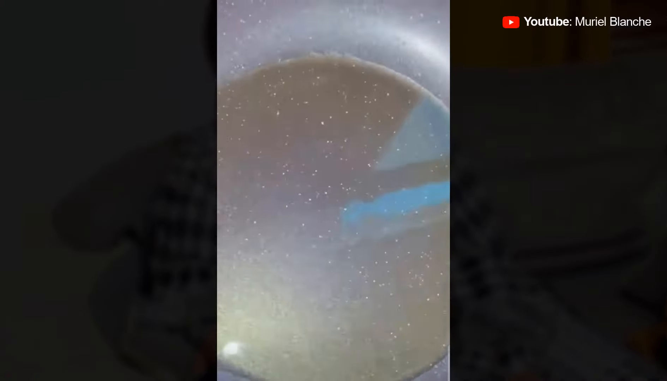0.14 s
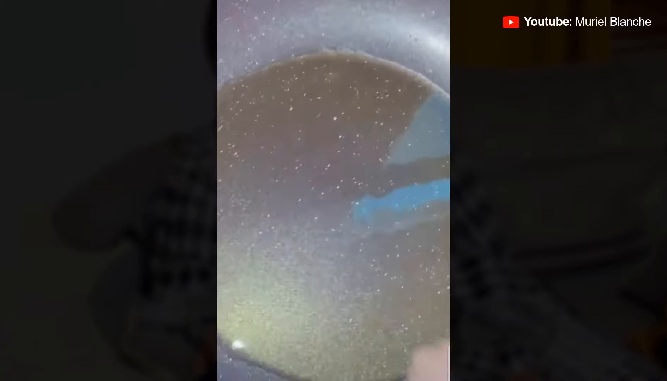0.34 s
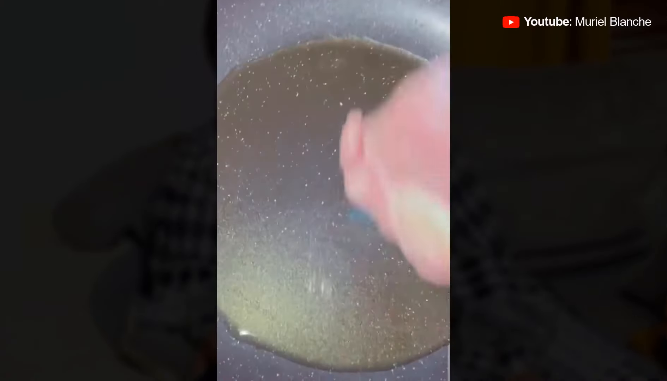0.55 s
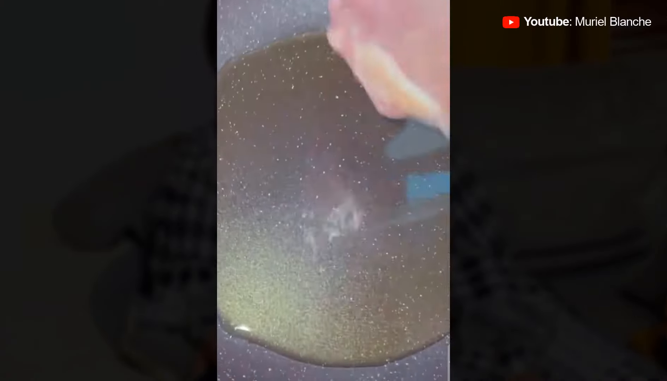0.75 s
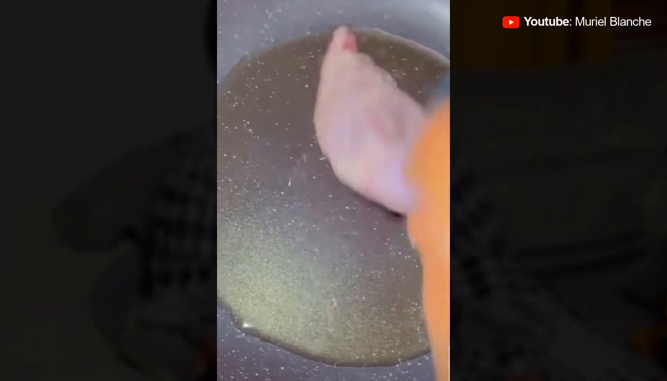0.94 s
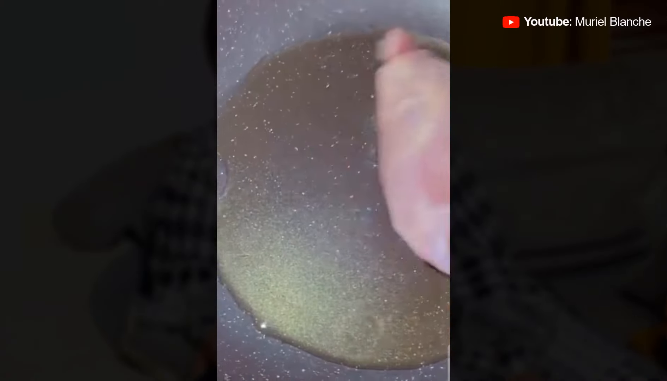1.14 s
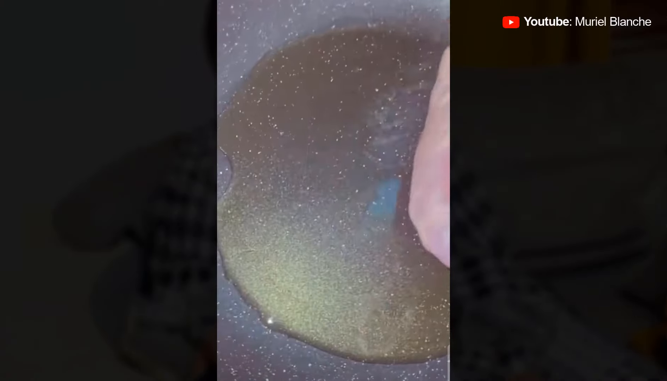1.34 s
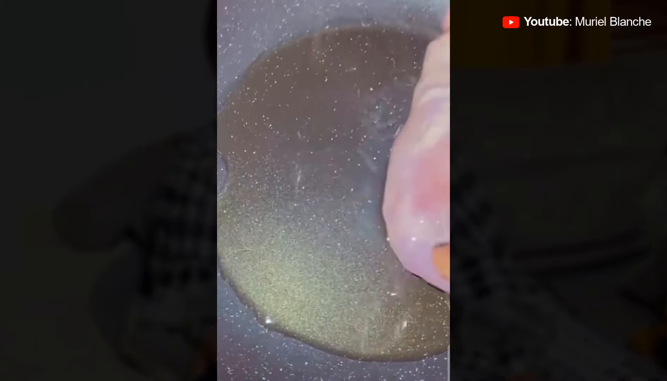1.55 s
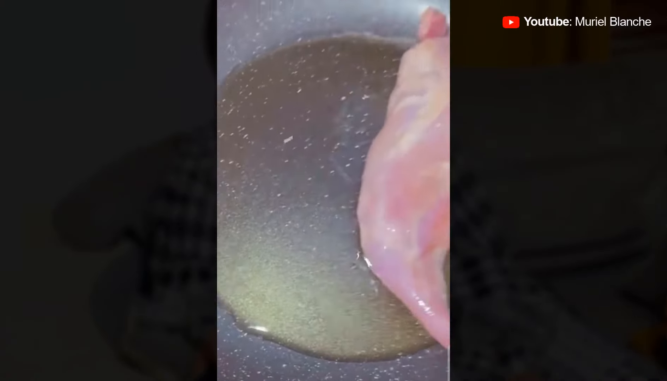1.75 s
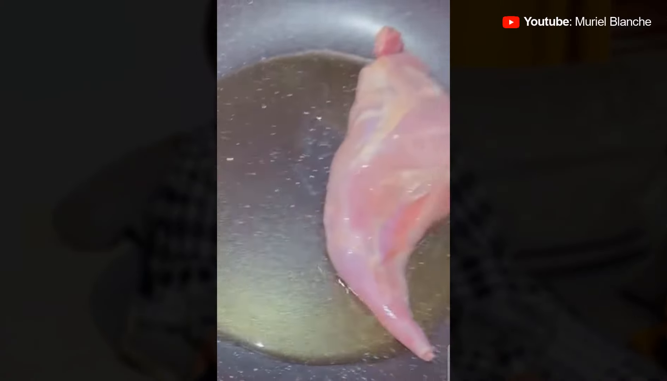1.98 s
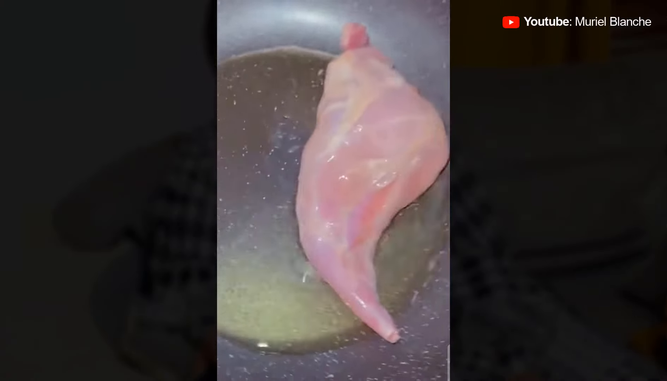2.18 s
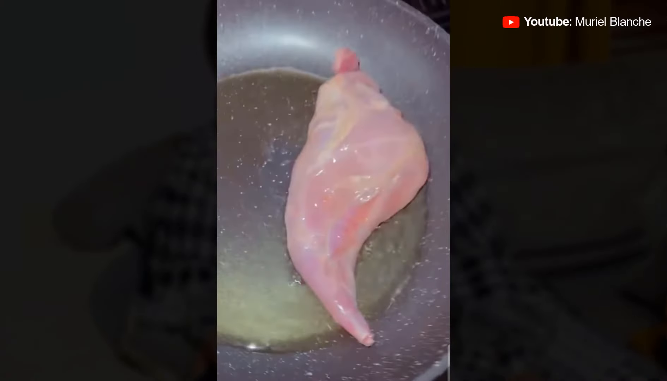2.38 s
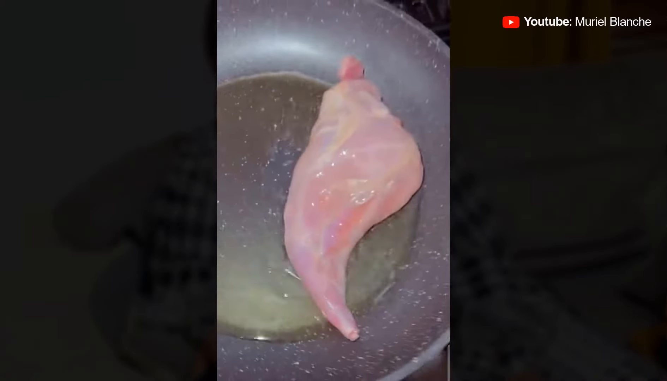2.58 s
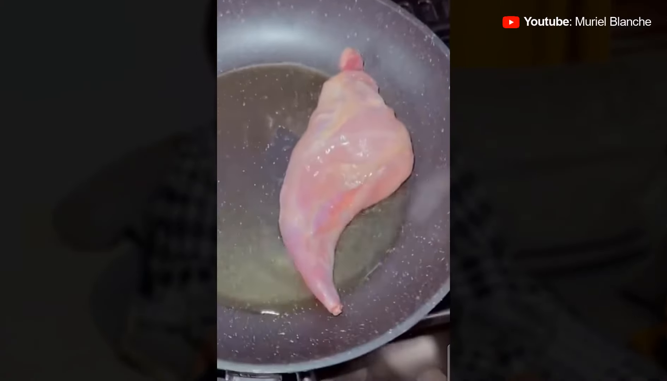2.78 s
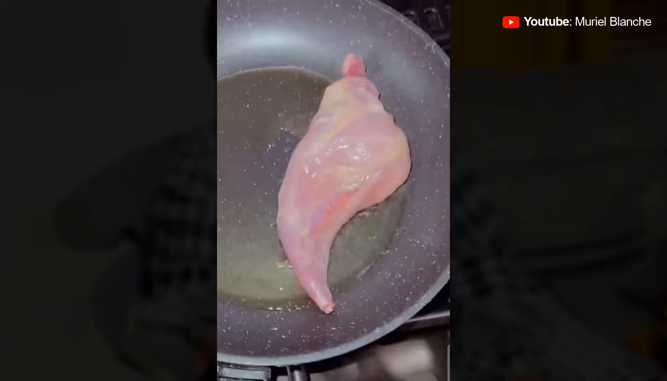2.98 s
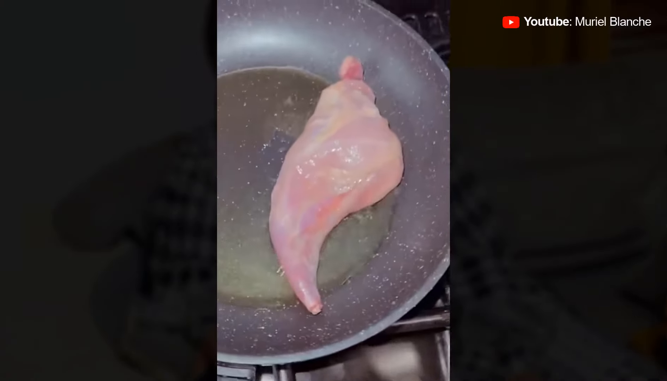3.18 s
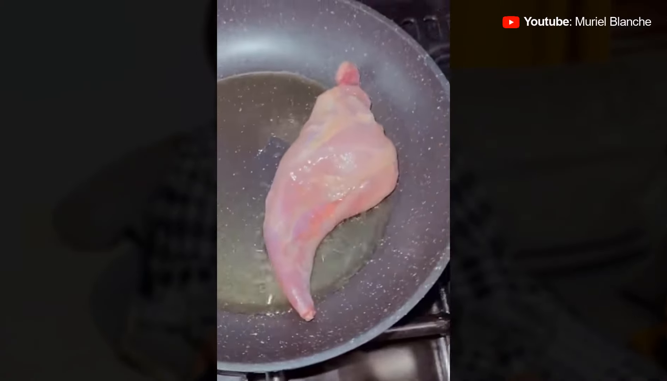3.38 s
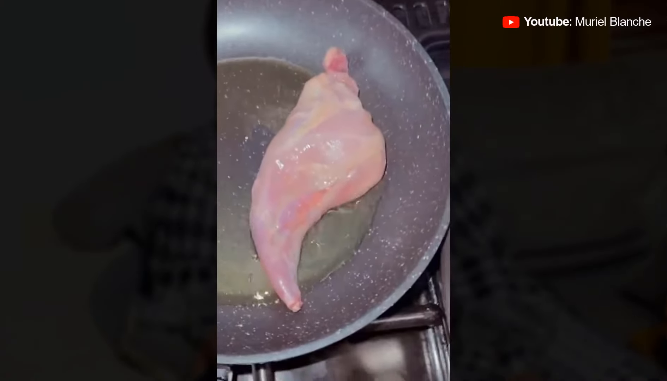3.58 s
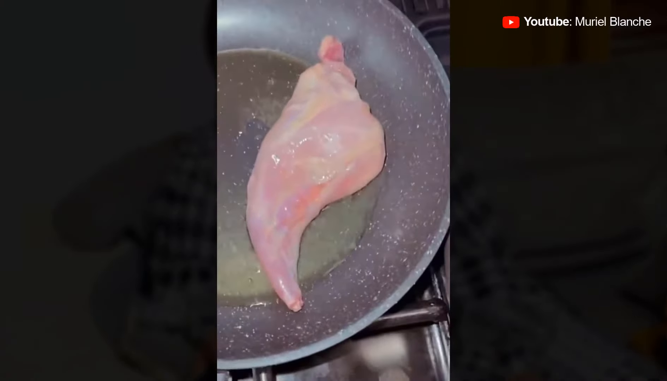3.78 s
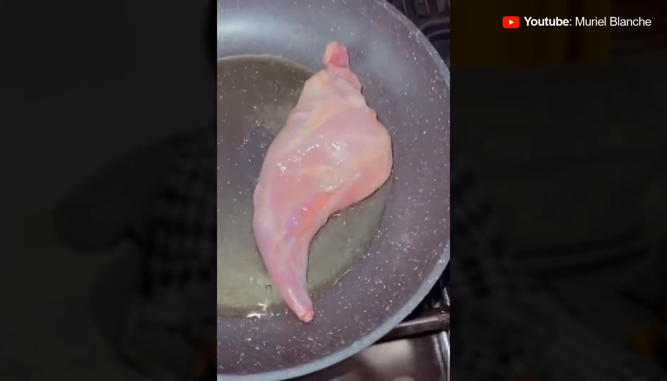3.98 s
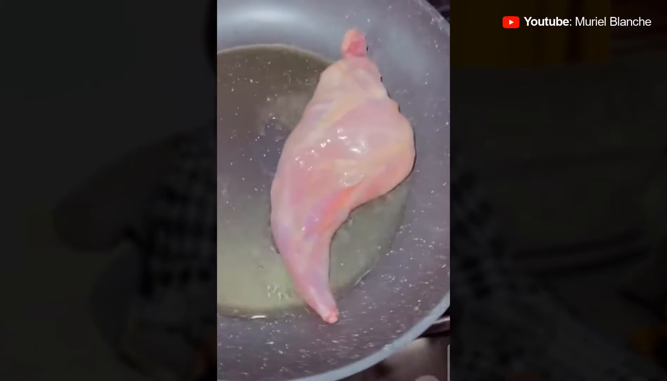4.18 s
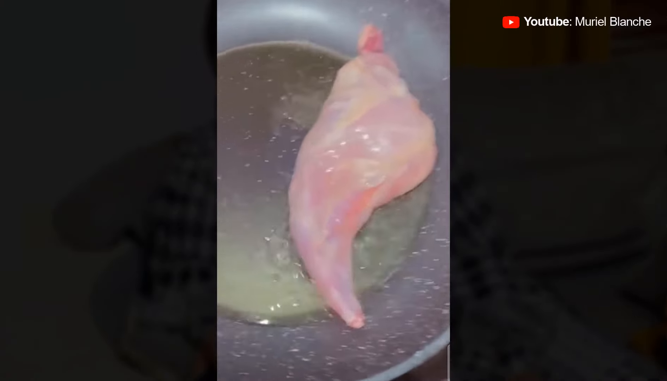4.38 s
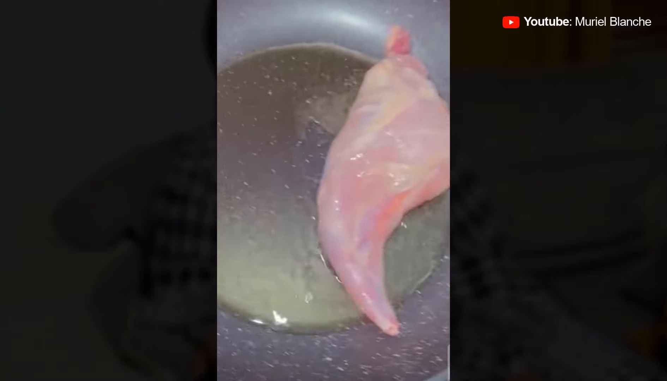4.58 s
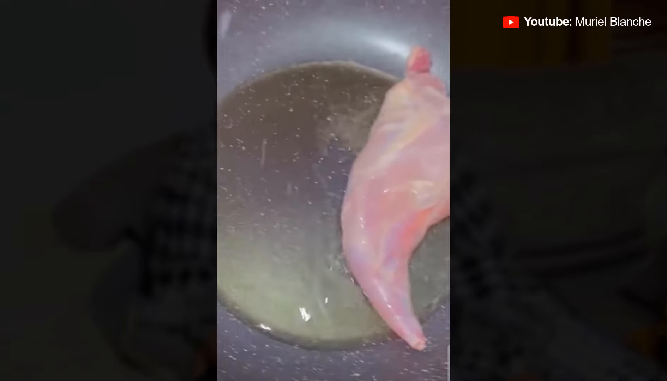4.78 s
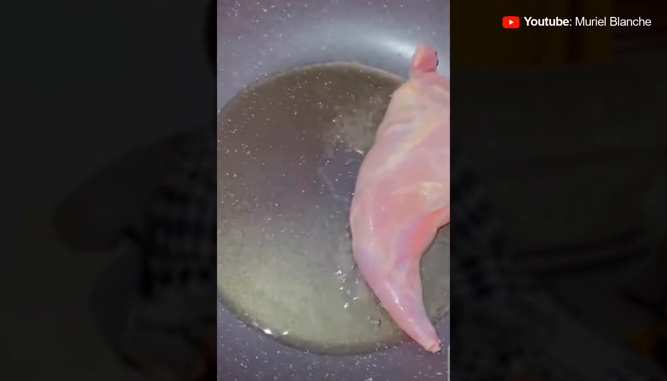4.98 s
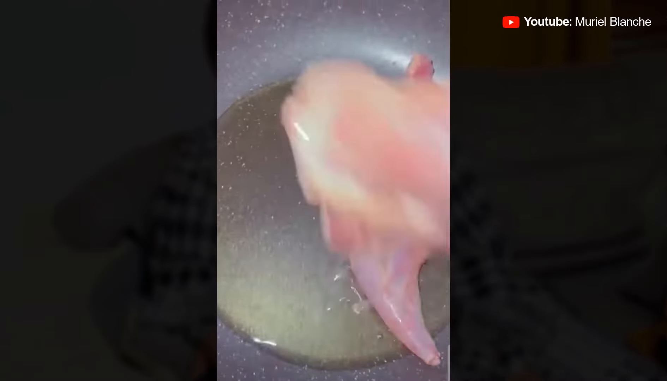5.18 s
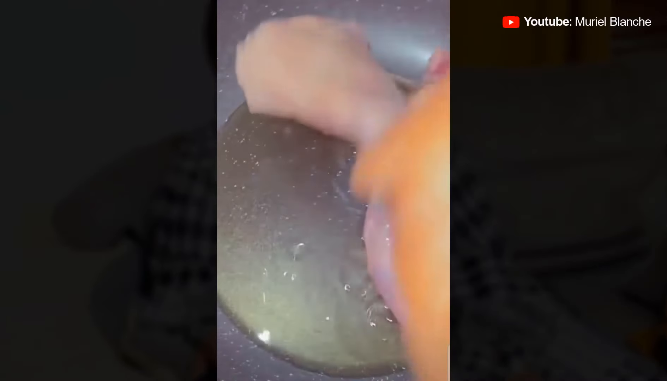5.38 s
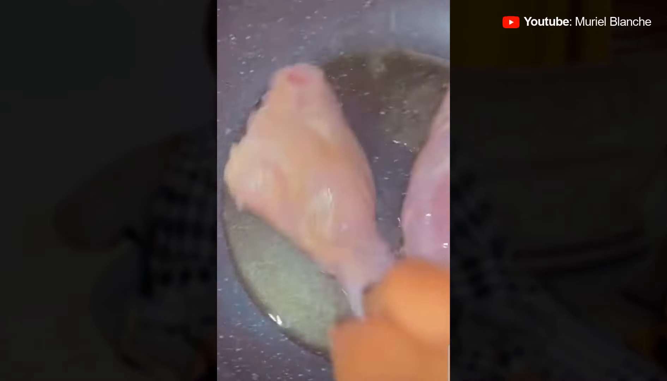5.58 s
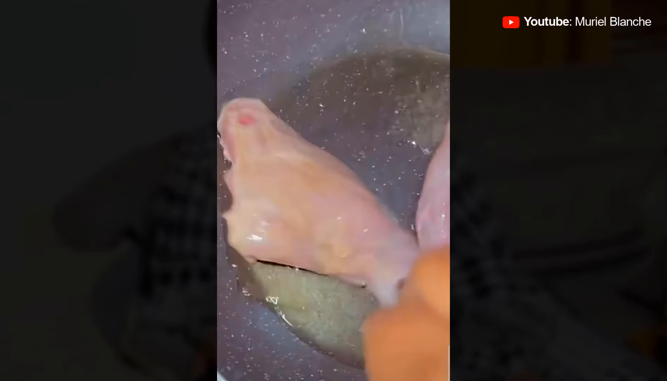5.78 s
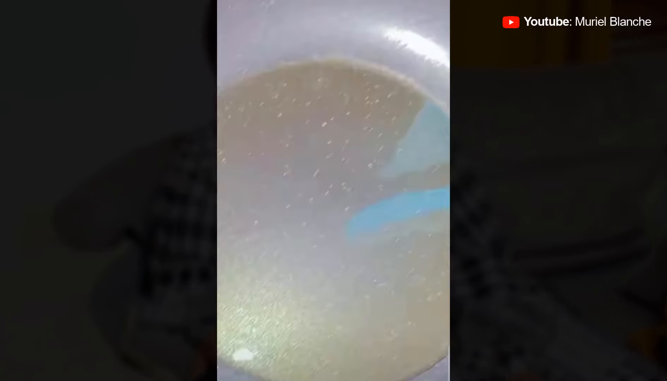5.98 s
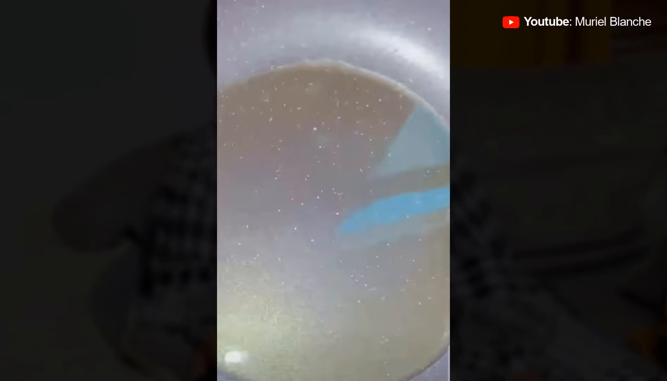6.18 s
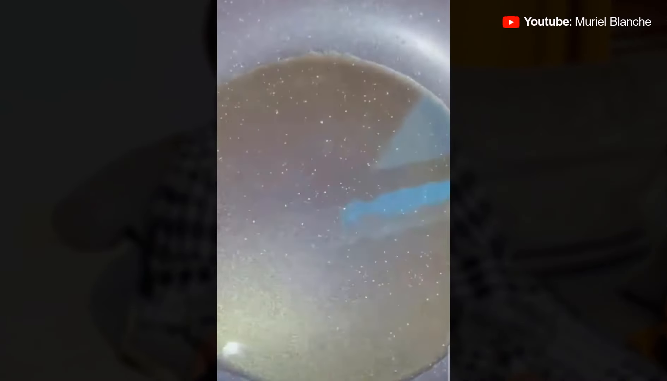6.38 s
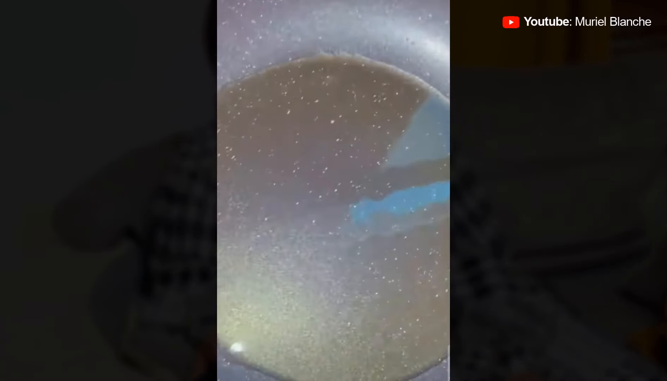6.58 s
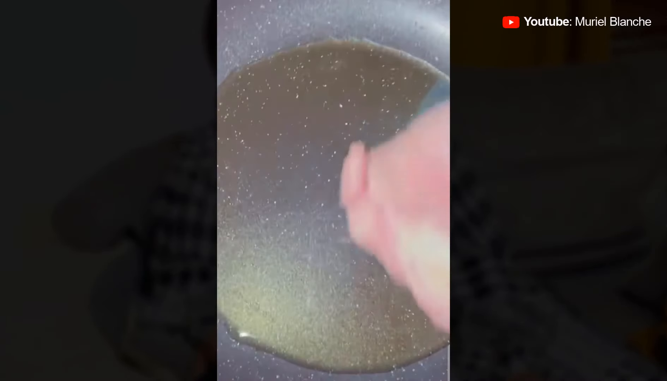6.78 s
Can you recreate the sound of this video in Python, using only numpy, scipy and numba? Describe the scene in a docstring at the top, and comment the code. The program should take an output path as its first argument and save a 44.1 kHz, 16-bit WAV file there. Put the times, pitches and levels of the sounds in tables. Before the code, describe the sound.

A faint stove rush and handling rustles begin slightly muffled. Meat touches hot oil, with blunt pan thumps, squelches and short steam squirts. The sizzle thickens with gurgles, ringing bubble pops and crackling droplets, heard from just above the pan in a small, dry room. After an abrupt short dropout, the quiet stove and light rustles resume.

```python
"""Meat frying in hot oil

Raw meat is laid into hot oil in a frying pan on a kitchen stove, heard from just above the pan.
It flops down in a few soft blows that excite the low modes of the pan. Its water flashes to steam:
swarms of ringing bubbles fizz and gurgle, single cavities pop, and droplets spit as short noise bursts.
Filtered noise makes the stove's rush and the rustles of handling. The sound breaks off for a moment,
then only the quiet stove and a few rustles return; the treble is dull at the start and at the return."""
import sys
import numpy as np
from scipy import signal
from scipy.fft import rfft, irfft, next_fast_len
from scipy.io import wavfile
from scipy.ndimage import uniform_filter1d
from numba import njit

SR = 44100
rng = np.random.default_rng(int(sys.argv[2]) if len(sys.argv) > 2 else 0)


def output_pcm(signal):
    """Save a mono or channel-first signal as 16-bit PCM at the path in sys.argv[1].

    Samples are clipped to [-1, 1] before scaling.
    """
    pcm = np.clip(np.atleast_2d(signal).T, -1, 1) * 32767
    wavfile.write(sys.argv[1], SR, np.round(pcm).astype(np.int16))


N = 301836
T = np.arange(N) / SR  # time, s

# spectrum of the stove's rush and prickle: f/Hz, relative level/dB
STOVE_COLOUR = [(25, -21.5), (52, -4.5), (88, -12.5), (135, 0), (230, -10.5), (380, -20), (600, -14.5),
                (760, -20.5), (2200, -21), (3100, -23.5), (6200, -21.5), (6700, -25), (8400, -24),
                (14000, -30)]
# partials of a kitchen appliance's hum: f/Hz, mean peak level/dB
HUM_PARTIALS = [(48.5, -70.5), (129.5, -71), (248, -81.5), (437, -74.5), (582, -72)]
# faint rustles as the meat is handled: t/s, length/s, centre f/Hz, relative level/dB
RUSTLES = [(0.193, 0.066, 4500, -62.5), (0.28, 0.06, 4500, -66), (0.344, 0.35, 2100, -66),
           (.35, 0.22, 238, -70), (0.538, 0.069, 4500, -62), (6.43, 0.068, 4500, -63),
           (6.52, 0.058, 4500, -65), (6.583, 0.37, 2100, -65.5), (6.59, 0.25, 240, -69),
           (6.777, 0.073, 4440, -62.5)]
# fizz of water flashing to steam, over time: t/s, relative level/dB
FIZZ_LEVEL = [(1.6, -40), (1.73, -42.5), (2.31, -39.5), (3.27, -41.5), (5.29, -40.5), (5.52, -37.5),
              (5.6, -39.5)]
# spectrum of the fine fizz: f/Hz, relative level/dB
FIZZ_COLOUR = [(50, -38), (150, -12.5), (450, -10.5), (690, -16), (790, -9.5), (1010, -10), (1270, -12),
               (1850, -6), (2300, 1), (2900, -1.5), (6400, -2.5), (6580, -9.5), (7800, -7), (12000, -13.5),
               (15500, -13)]
# spectrum of the larger bubbles: f/Hz, relative level/dB
BUBBLE_COLOUR = [(300, -34), (800, -20.5), (1000, -18.5), (1300, -11), (1900, -14), (2300, 1.5), (2750, -3),
                 (3300, -1.5), (3950, 0), (4600, -4.5), (6200, -12.5), (8000, -43.5)]
# the meat flops onto the pan and later settles twice more:
# t/s, contact length/s, relative thump level/dB, wet squelch level/dB, squelch centre f/Hz
FLOPS = [(0.845, 0.067, -44.5, -48.5, 700), (1.085, 0.081, -39, -44.5, 865), (1.294, .085, -39, -41, 630),
         (1.4955, 0.09, -38, -43.5, 1105), (2.465, 0.046, -75.5, -49, 260), (5.411, 0.088, -53, -60.5, 425)]
# modes of the pan on its grate, undamped: f/Hz, t60/s, relative level/dB
PAN_MODES = [(60, 0.15, -10.5), (129, .72, -5.5), (146.6, 0.22, -11), (176, 0.16, -17), (256, 0.21, -20),
             (299.2, .4, -19), (370, .3, -27), (512, .28, -23), (681, 0.32, -19)]
# steam squeezed from under the meat: t/s, length/s, start f/Hz, end f/Hz, level/dB
SQUIRTS = [(0.865, 0.029, 7200, 7900, -42), (0.93, 0.067, 4400, 2940, -39.5),
           (1.038, 0.065, 4200, 2700, -44), (1.384, 0.04, 3600, 4830, -42), (1.462, 0.05, 4800, 8350, -40)]
# the sharpest droplets spitting out of the oil: t/s, relative level/dB
SPITS = [(.981, -17), (1.377, -20), (1.756, -14), (2.085, -9.5), (2.282, -5), (2.5057, -16), (2.718, -11),
         (2.735, -9), (2.958, -12.5), (3.4374, -11), (4.366, -10.5), (4.4185, -9.5), (4.828, -10.5),
         (5.1985, -12), (5.224, -8.5), (5.366, -6), (5.4862, -13.5), (5.7424, -15.5)]
# the loudest steam bubbles bursting: t/s, relative level/dB, starting f/Hz, ring t60/s
POPS = [(.997, -26, 2130, 0.013), (1.3507, -25.5, 2580, 0.018), (1.6192, -20, 3890, 0.01),
        (1.835, -22.5, 3160, .007), (1.9127, -23, 3200, .018), (1.927, -17, 2560, .005),
        (2.1415, -20, 2430, 0.033), (2.1734, -27, 2400, 0.039), (2.2516, -23.5, 3100, 0.029),
        (2.3819, -19.5, 2330, .015), (2.4051, -16, 3600, 0.0074), (2.424, -19, 3220, 0.0044),
        (2.4678, -20, 3780, 0.013), (2.608, -24, 3720, 0.025), (2.7087, -19.5, 2430, 0.011),
        (2.876, -18, 3900, 0.0098), (2.8954, -18.5, 2390, 0.02), (3.0231, -21.5, 3800, 0.023),
        (3.045, -25.5, 2520, 0.011), (3.263, -23.5, 2750, 0.0038), (3.2851, -20.5, 4450, .013),
        (3.4463, -21.5, 3190, 0.013), (3.5419, -15, 3340, .008), (3.6518, -18, 2600, 0.0042),
        (3.6792, -33.5, 1250, .032), (3.7558, -21, 3260, 0.066), (3.895, -17.5, 2900, 0.0091),
        (3.9782, -17.5, 2330, 0.0057), (3.9868, -16, 3230, 0.0052), (4.0224, -30.5, 1350, 0.066),
        (4.0996, -16, 3340, 0.0046), (4.1653, -16.5, 2650, 0.0059), (4.1738, -16, 3400, .0055),
        (4.2116, -21, 2730, .012), (4.235, -17.5, 3470, .004), (4.2676, -14.5, 2250, .022),
        (4.2757, -18, 2260, 0.0056), (4.3053, -19, 3060, .014), (4.3957, -19.5, 2430, 0.015),
        (4.477, -17, 2970, 0.0061), (4.522, -16, 3520, 0.007), (4.667, -18, 2680, 0.014),
        (4.6774, -17, 3740, 0.012), (4.774, -18, 3400, .005), (4.7961, -22, 3920, .016),
        (4.8089, -20, 3350, 0.042), (4.8333, -16.5, 2720, 0.012), (5.0135, -25.5, 3140, 0.041),
        (5.092, -20, 3700, 0.028), (5.1202, -33, 1330, 0.036), (5.1453, -20, 3040, 0.04),
        (5.1562, -18.5, 3830, 0.019), (5.25, -21.5, 3380, 0.025), (5.3285, -18, 4100, .0055),
        (5.4232, -20.5, 3640, 0.011), (5.4864, -16.5, 2940, 0.0077), (5.503, -13.5, 3640, .011),
        (5.5126, -18.5, 3980, .024), (5.5621, -14.5, 3350, 0.0049), (5.6512, -17.5, 2605, 0.016),
        (5.6893, -14, 2970, 0.0051)]
# gurgle of bubbles trapped under the meat, over time: t/s, relative level/dB
GURGLE_LEVEL = [(1.6, -44), (1.68, -48), (2.28, -45), (3.83, -50), (4.62, -48.5), (5.1, -53.5),
                (5.62, -44.5)]
# spectrum of the gurgle: f/Hz, relative level/dB
GURGLE_COLOUR = [(700, -18), (800, -2.5), (1010, -9.5), (1290, 3.5), (1600, -4), (2000, -1.5)]
# the gap in the sound: start t/s, end t/s
GAP = (5.815, 6.152)
# spans of dull treble: start t/s, end t/s
DULL_SPANS = [(-1, .145), (6.0, 6.385)]

DULL_HZ, TOP_HZ = 6600, 15750  # upper limit in the dull spans, and throughout
STOVE_DB = -59
# the fizz starts as the meat touches the oil and grows as the rest of it is lowered in
TOUCH_S, FIZZ_ATTACK_S, LOWERING_S = .842, .025, .5
FIRST_CONTACT = .2  # share of the meat that touches at first
FLAT_S, BUILD_S = 1.5, .5  # the meat lies flat from here on; time for the larger bubbles to build up
# each flop presses wet meat into the oil, which boils up a moment later (level against the squelch)
BOIL_UP_LAG_S, BOIL_UP_WIDTH_S, BOIL_UP_DB = .09, .06, 4.5
BOIL_UP_TOP_DB = -42  # no boil-up is louder than this
# bubbling between the surges; the rate is of its random wander, per second
SIMMER_DB, SIMMER_WANDER_DB, SIMMER_RATE = -38.5, 2.5, 20
# every loud pop is the peak of a surge of bubbles (level against the pop)
SURGE_RISE_S, SURGE_FALL_S, SURGE_DB = .008, .027, -18
JUDDER = .045  # noise force while the meat settles, before the window
OVERSHOOT, OVERSHOOT_T60 = .55, .0028  # extra first swing of a pop: share of the ring, t60 in s


def undb(db):
    """Level and amplitude: a gain is ten to the power of the decibels over twenty."""
    return 10 ** (np.asarray(db) / 20)


def unit(x):
    """Normalisation: the signal is scaled to an rms of 1."""
    return x / np.sqrt(np.mean(x ** 2))


def add(out, s, x):
    """Superposition: x is summed into out from time s on."""
    first = max(int(s * SR), 0)
    out[first:first + len(x)] += x[:N - first]


def band(x, lo_hz, hi_hz, order=2):
    """Band limitation: a Butterworth filter passes only lo_hz to hi_hz."""
    edges = [lo_hz, min(hi_hz, SR / 2 - 1)]
    return signal.sosfilt(signal.butter(order, edges, "band", fs=SR, output="sos"), x)


def colour(x, points):
    """Minimum phase: a causal filter through spectrum points keeps the sharp front of clicks."""
    hz, db = np.transpose(points)
    n = next_fast_len(N + SR // 10, real=True) * 2
    f = np.maximum(np.arange(n // 2 + 1) * SR / n, 1)
    gain = undb(np.interp(np.log(f), np.log(hz), db))
    # folding the cepstrum onto positive time makes the filter causal
    cepstrum = irfft(np.log(gain))
    cepstrum[1:n // 2] *= 2
    cepstrum[n // 2 + 1:] = 0
    return irfft(rfft(x, n) * np.exp(rfft(cepstrum)))[:N]


def walk(rate):
    """Slow fluctuation: random steps, rate per second, are smoothed to a wander of rms 1."""
    k = max(int(SR / rate), 1)
    steps = np.repeat(rng.standard_normal(N // k + 1), k)
    return unit(uniform_filter1d(steps, k)[:N])


def fade(t, t60):
    """Exponential damping: the amplitude falls by 60 dB in t60."""
    return np.exp(-np.log(1000) * t / t60)


@njit
def bubbles(start, hz, t60, size):
    """Bubble resonance: each cavity is a decaying sine whose pitch rises by 6 percent."""
    out = np.zeros(N)
    for k in range(len(start)):
        n, first = int(t60[k] * SR), int(start[k] * SR)
        z = size[k] + 0j
        step = np.exp(2j * np.pi * hz[k] / SR - 6.9 / (t60[k] * SR))
        glide = np.exp(2j * np.pi * hz[k] / SR * .06 / (n + 1))
        for i in range(first, min(first + n, N)):
            out[i] += z.imag
            z *= step
            step *= glide
    return out


def swarm(lo_hz, hi_hz, cycles, spread_db, cap, count):
    """Random superposition: many small and few large bubbles, each ringing for its own cycles."""
    when, pitch, big, life = rng.random((count, 4)).T
    hz = lo_hz + (hi_hz - lo_hz) * pitch
    t60 = cycles * np.exp(2 * life - 1) / hz
    size = undb(spread_db * np.minimum(-np.log(1 - big), cap)) / np.sqrt(t60)
    return unit(bubbles(when * N / SR, hz, t60, size))


def stove(waver_db=1.2, tick_db=-12, hum_waver_db=2):
    """Broadband and tonal sources: a noise rush, the faint prickle of hot oil and a wavering hum."""
    rush = rng.standard_normal(N) * undb(waver_db * walk(12))
    prickle = undb(tick_db) * swarm(1800, 8100, cycles=17, spread_db=2.0, cap=3.3, count=5000)
    hum = np.zeros(N)
    for hz, db in HUM_PARTIALS:
        level = undb(db + hum_waver_db * walk(9.7))
        hum += level * np.sin(2 * np.pi * hz * T + .49 * walk(5.1))
    return undb(STOVE_DB) * unit(colour(rush + prickle, STOVE_COLOUR)) + hum


def rustles(rustle_db=-1.5):
    """Friction noise: brief rubbing sounds swell quickly and die away."""
    out = np.zeros(N)
    for s, length, hz, db in RUSTLES:
        u = np.linspace(0, 1, int(length * SR))
        noise = band(rng.standard_normal(len(u)), hz / 1.55, hz * 1.4)
        rub = noise * np.sin(np.pi * np.sqrt(u))
        add(out, s, undb(db + rustle_db) * unit(rub))
    return out


def snaps(rate, spread_db, cap, snap_s):
    """Impulsive rupture: thin oil films snap at random in noise bursts, many small and few large."""
    chance, big = rng.random((2, N))
    size = (chance < rate / SR) * undb(spread_db * np.minimum(-np.log(1 - big), cap))
    power = signal.lfilter([1], [1, -np.exp(-1 / (snap_s * SR))], size ** 2)
    envelope = np.sqrt(np.abs(uniform_filter1d(power, size=15)))
    return unit(envelope * rng.standard_normal(N))


def since_touch(rise_s):
    """Onset of contact: grows from 0 to 1 in rise_s once the meat touches the oil."""
    return np.clip((T - TOUCH_S) / rise_s, 0, 1)


def fizzing(fizz_db=4.0, flutter_db=1.5):
    """Area source: the power of the fizz follows the area of meat in the oil, and it flutters."""
    area = np.clip(FIRST_CONTACT + since_touch(LOWERING_S), 0, 1)
    level_db = np.interp(T, *np.transpose(FIZZ_LEVEL)) + fizz_db + flutter_db * walk(60)
    return since_touch(FIZZ_ATTACK_S) * np.sqrt(area) * undb(level_db)


def bubbling():
    """Addition of powers: boil-ups after the flops, a simmer, and a surge around each loud pop."""
    heated = np.clip((T - FLAT_S) / BUILD_S, 0, 1)
    simmer_db = SIMMER_DB + SIMMER_WANDER_DB * np.tanh(walk(SIMMER_RATE))
    power = heated * undb(simmer_db) ** 2
    for s, length, db, squelch_db, hz in FLOPS:
        boil_up = np.exp(-((T - s - BOIL_UP_LAG_S) / BOIL_UP_WIDTH_S) ** 2)
        power += undb(min(squelch_db + BOIL_UP_DB, BOIL_UP_TOP_DB)) ** 2 * boil_up
    t = np.arange(-SR // 5, SR // 5) / SR
    surge = np.exp(np.minimum(t / SURGE_RISE_S, -t / SURGE_FALL_S))
    for s, db, hz, t60 in POPS:
        add(power, s + t[0], undb(db + SURGE_DB) ** 2 * surge)
    return np.sqrt(power)


def sizzle(crackle_db=-4, sputter_db=3):
    """Boiling noise: a fine fizz with crackle in it, and surges of larger, sputtering bubbles."""
    fizz = swarm(210, 16000, cycles=24.3, spread_db=2.5, cap=4.1, count=80000)
    crackle = snaps(rate=800, spread_db=4.0, cap=4.4, snap_s=.00045)
    fine = unit(colour(fizz + undb(crackle_db) * crackle, FIZZ_COLOUR))
    # larger bubbles ring long enough for each to have a pitch
    large = swarm(1000, 6000, cycles=36, spread_db=3.4, cap=3.6, count=6000)
    sputter = snaps(rate=240, spread_db=4.2, cap=3.3, snap_s=.0005)
    coarse = unit(colour(large + undb(sputter_db) * sputter, BUBBLE_COLOUR))
    return fine * fizzing() + coarse * bubbling()


def pan_ring(force, ring=1):
    """Modal response: force drives the pan's low modes, their decay times scaled by ring."""
    t = np.arange(SR * 2 // 3) / SR
    response = np.zeros(len(t))
    for hz, t60, db in PAN_MODES:
        response += undb(db) * np.sin(2 * np.pi * hz * t) * fade(t, t60 * ring)
    # the slowest motion radiates nothing
    return band(signal.fftconvolve(force, response), 42, 4000, order=4)


def flops(thump_db=-6, landing_s=.0299, push_s=.0014):
    """Soft impact: meat lands with a blunt push, judders as it settles and squeezes out oil."""
    out = np.zeros(N)
    for s, length, db, squelch_db, hz in FLOPS:
        n = int(length * SR)
        push = np.exp(-((np.arange(n) / SR - landing_s) / (push_s / 2)) ** 2)
        judder = JUDDER * rng.standard_normal(n) * np.hanning(n)
        force = judder + 2 * push / push.sum()
        add(out, s, undb(db + thump_db) * unit(pan_ring(force)))
        contact = signal.windows.tukey(n, .5)
        squelch = unit(band(rng.standard_normal(n), hz / 1.47, hz * 1.37, order=1) * contact)
        add(out, s, undb(squelch_db) * squelch)
    return out


def rumble(rumble_db=-54.5, damped=.29, patchy_db=2):
    """Forced vibration: boiling shakes the pan in fits; the meat lying in it damps the ring."""
    boiling = np.interp(T, [.85, .95, GAP[0], GAP[1]], [0, 1, 1, 0])
    shaking = rng.standard_normal(N) * undb(patchy_db * walk(9))
    return undb(rumble_db) * boiling * unit(pan_ring(shaking, damped)[:N])


def squirts(width_hz=600):
    """Jet noise: steam escapes through a changing gap, a narrow hiss that glides."""
    out = np.zeros(N)
    for s, length, start_hz, end_hz, db in SQUIRTS:
        n = int(length * SR)
        turn = 2 * np.pi * np.cumsum(np.geomspace(start_hz, end_hz, n)) / SR
        # slow noise on a gliding carrier gives a band around it
        hiss = band(rng.standard_normal(n), 20, width_hz) * np.sin(turn)
        add(out, s, undb(db) * unit(hiss * np.hanning(n)))
    return out


def spits(spit_db=-5, swell_s=.00094, spit_t60=.009):
    """Explosive vaporisation: water droplets burst in very short, bright cracks of noise."""
    out, t = np.zeros(N), np.arange(SR // 100) / SR
    for s, db in SPITS:
        shape = np.minimum(t / swell_s, 1) ** 2 * fade(t, spit_t60)
        crack = band(rng.standard_normal(len(t)) * shape, 1000, 14000, order=1)
        # equal energy before the level is set
        add(out, s - swell_s / 2, 2 * undb(db + spit_db) * crack / np.linalg.norm(crack))
    return out


def small_pops(small_db=-25, spread_db=3, lo_hz=2200, hi_hz=4100, t60=.016, count=40):
    """Random bursting: rows like POPS for lesser bubbles, once the boil has built up."""
    when, big, pitch, life = rng.random((count, 4)).T
    start = FLAT_S + BUILD_S
    s = start + (GAP[0] - start) * (np.arange(count) + when) / count
    db = small_db + spread_db * (2 * big - 1)
    hz = lo_hz * (hi_hz / lo_hz) ** pitch
    return list(zip(s, db, hz, t60 * np.exp(2 * life - 1)))


def pops(snap_t60=.011, swell_s=.0007, rise=.022):
    """Cavity resonance: a bubble tears open with a snap, then rings, rising as it shrinks."""
    out, t = np.zeros(N), np.arange(SR // 20) / SR
    age = np.maximum(t - swell_s, 0)
    opening = np.minimum(t / swell_s, 1) ** 2
    for s, db, hz, t60 in POPS + small_pops():
        turn = 2 * np.pi * hz * t * (1 + rise * np.minimum(t / t60, 1) / 2)
        # the first swing overshoots the ring
        ring = np.sin(turn) * (fade(age, t60) + OVERSHOOT * fade(age, OVERSHOOT_T60))
        snap = unit(band(rng.standard_normal(len(t)), 2300, 5540, order=4)) * fade(age, snap_t60)
        pop = opening * (ring + undb(-10) * snap)
        add(out, s - swell_s / 2, undb(db) * pop)
    return out


def gurgle(gurgle_db=-1, sealing_s=.04):
    """Size and pitch: wide, slow bubbles trapped under the meat ring low and long."""
    wide = swarm(700, 2000, cycles=61, spread_db=2.0, cap=2.9, count=2600)
    sealed = np.clip((T - FLAT_S) / sealing_s, 0, 1)
    level = undb(np.interp(T, *np.transpose(GURGLE_LEVEL)) + gurgle_db)
    return unit(colour(wide, GURGLE_COLOUR)) * sealed * level


def kitchen(x, room_db=-13, room_t60=.14):
    """Reverberation: convolution with decaying noise adds the short tail of a small room."""
    t = np.arange(SR // 2) / SR
    tail = rng.standard_normal(len(t)) * fade(t, room_t60) * (t > .004)
    return x + undb(room_db) * signal.fftconvolve(x, tail / np.linalg.norm(tail))[:N]


def scene():
    """Superposition: reverberant frying over the pan's thumps, the rustles and the stove."""
    frying = (sizzle() + gurgle() + pops() + spits() + squirts()) * (T < GAP[0])
    return (kitchen(frying) + flops() + rumble() + rustles() + stove())[None]


def record(dry):
    """Band limiting and gating: the treble is dull in two spans, the level drops out once, the top is cut."""
    low_pass = signal.ellip(10, .2, 80, DULL_HZ, fs=SR, output="sos")
    dull = signal.sosfilt(low_pass, dry)
    in_span = 1. * sum((T > a) & (T < b) for a, b in DULL_SPANS)
    share = uniform_filter1d(in_span, size=900)
    x = dull * np.sin(share * np.pi / 2) + dry * np.cos(share * np.pi / 2)
    gate_times = [GAP[0] - .018, GAP[0] + .005, GAP[1] - .004, GAP[1] + .01]
    gate = np.interp(T, gate_times, [1, 0, 0, 1])
    top_cut = signal.ellip(12, .2, 70, TOP_HZ, fs=SR, output="sos")
    return signal.sosfilt(top_cut, x * gate)


dry = scene()
out = record(dry)
output_pcm(out)
```